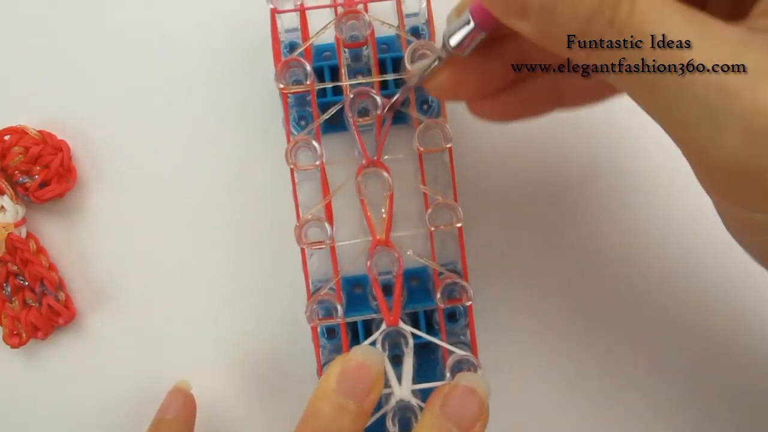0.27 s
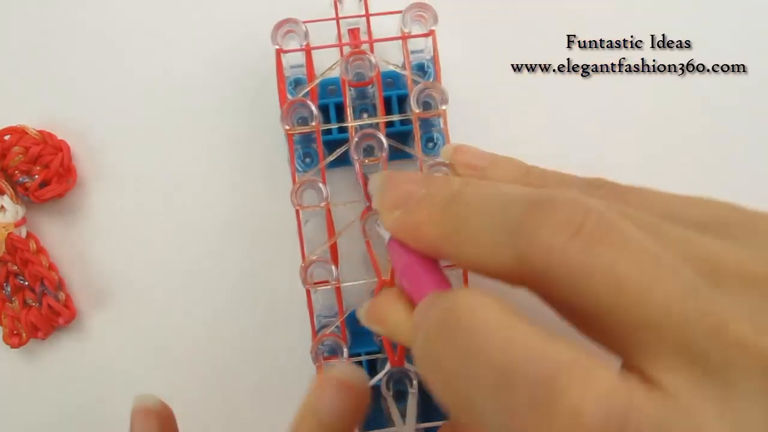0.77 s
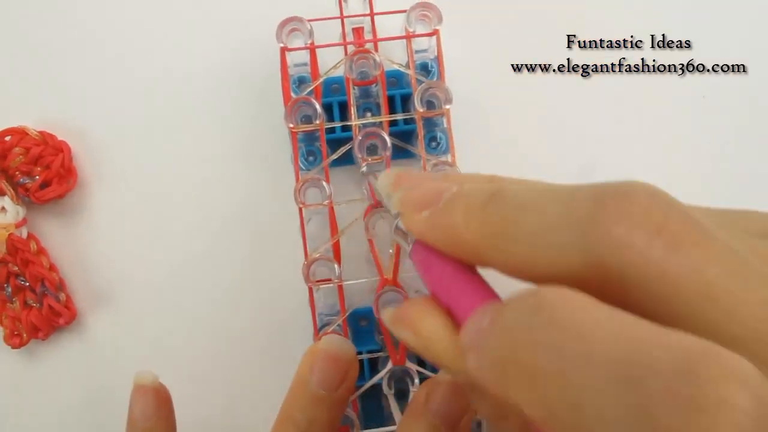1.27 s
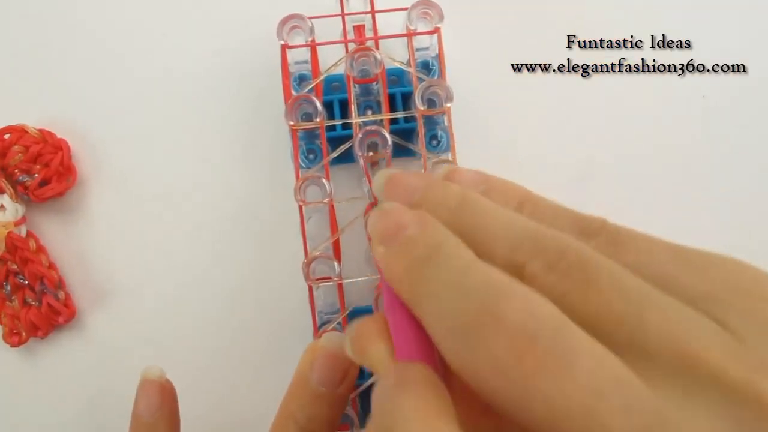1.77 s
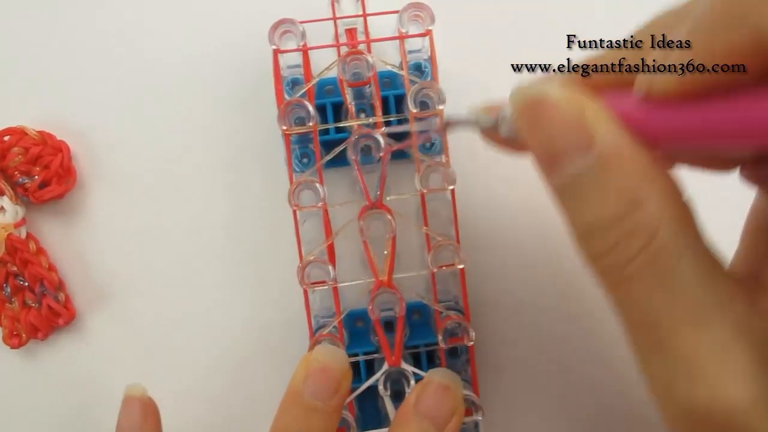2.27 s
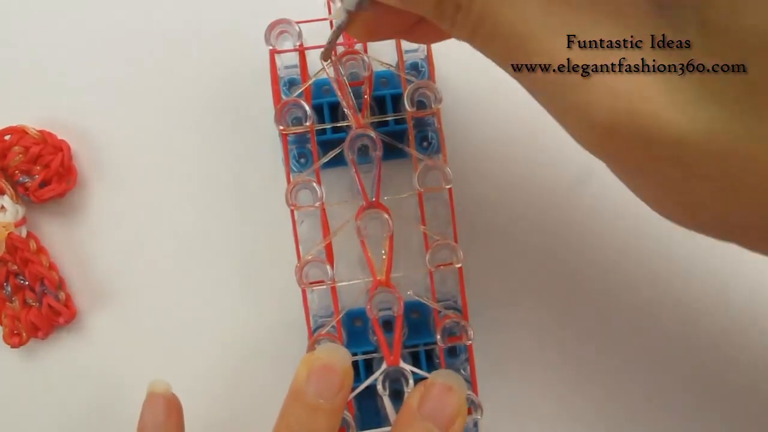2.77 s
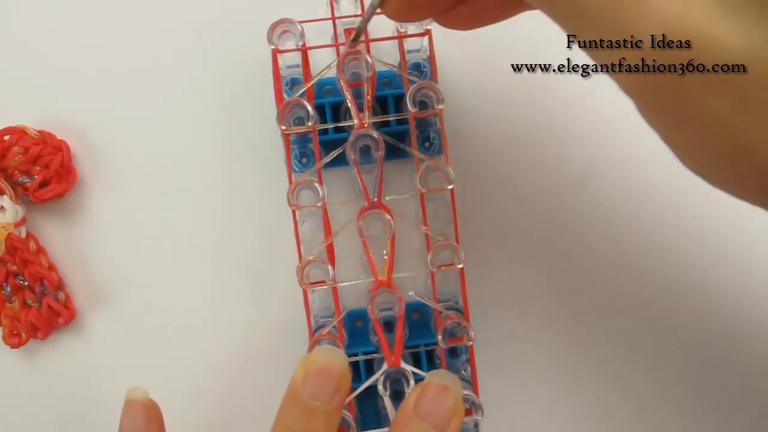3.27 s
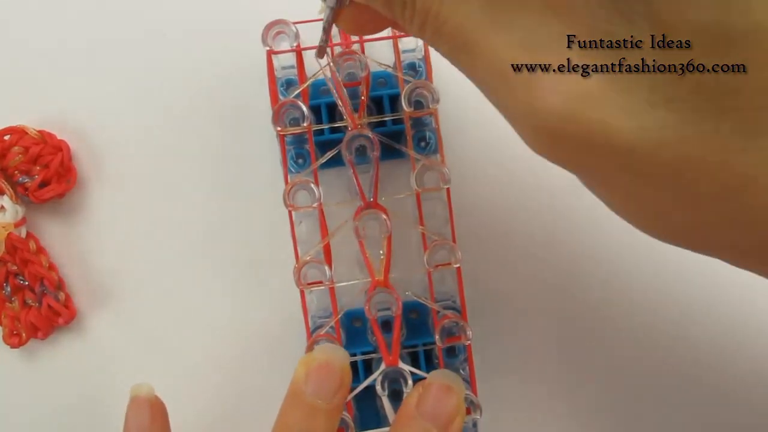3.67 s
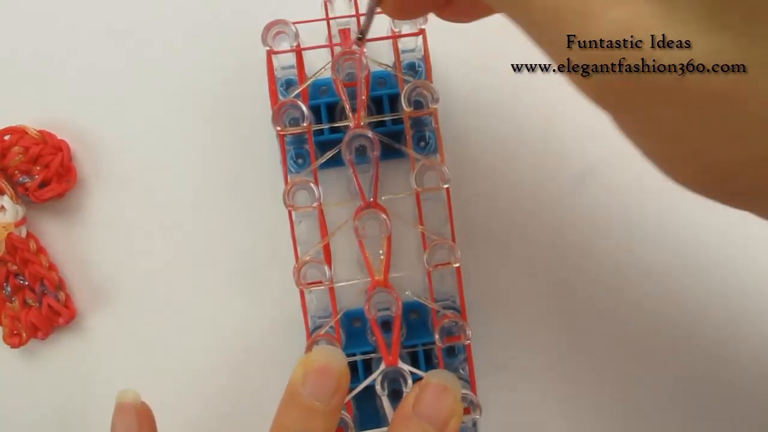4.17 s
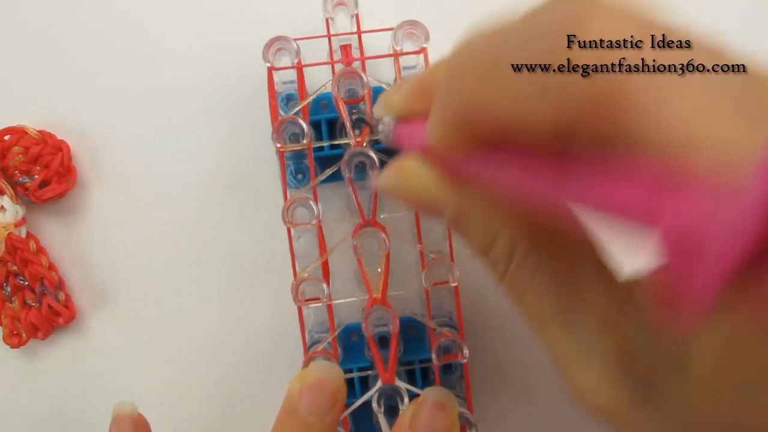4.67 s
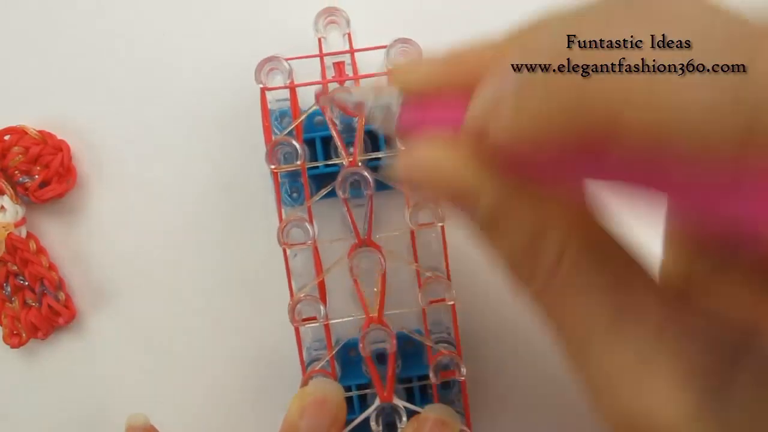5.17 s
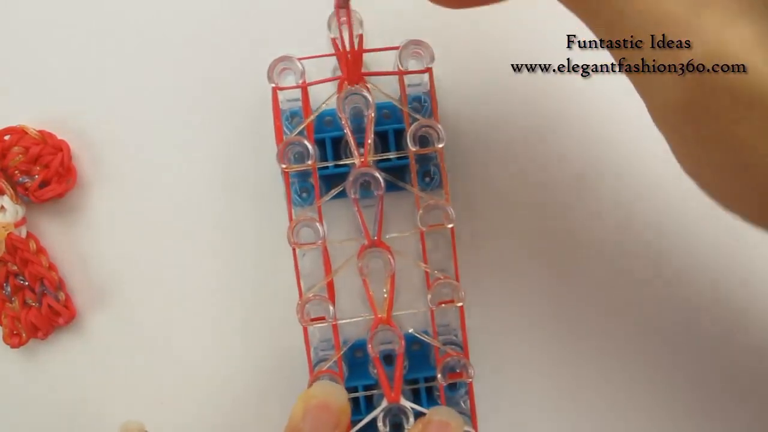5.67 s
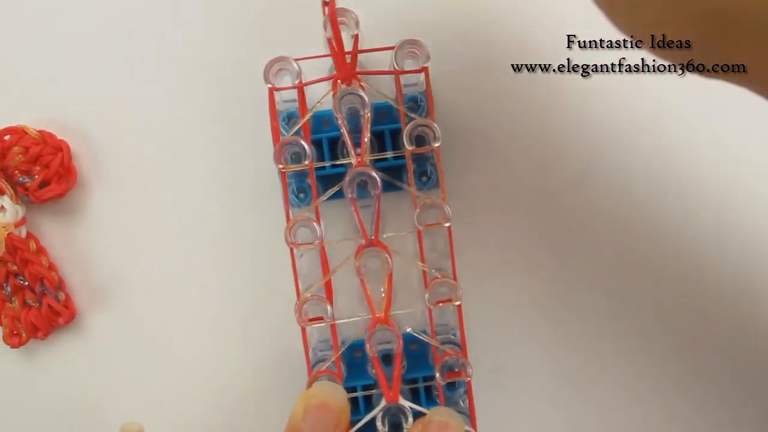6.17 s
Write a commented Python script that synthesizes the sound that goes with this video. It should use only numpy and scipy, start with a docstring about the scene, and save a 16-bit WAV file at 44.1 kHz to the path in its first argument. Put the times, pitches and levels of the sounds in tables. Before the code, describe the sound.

Small indoor room with steady low rumble, faint hum and hiss. Plastic pegs snap and tick as stretched rubber slides and squeaks along a hook, busiest in the first second. A harsh clack, mostly on the left, overwhelms the close microphone and briefly ducks everything. Then come isolated double clicks, quiet taps and soft rubs, closing with a strong hollow double knock.

```python
"""A small humming room: ventilation rumble, mains hum, hiss and a whine are steady noise bands and tones.
A hook lifts rubber bands over a plastic craft loom close to a camera, with a faint steady rub, and
stronger, squeaking slides at times. Each click is a snap, a crack and ringing peg modes over a base knock.
At about 1.1 s the hook's handle bumps the camera, which rings; the gain ducks and slowly recovers.
More clicks, taps and short rubs follow, closing with two clicks and strong knocks on the base."""
import sys
import numpy as np
from scipy import signal
from scipy.fft import rfft, irfft, next_fast_len
from scipy.io import wavfile
from scipy.ndimage import uniform_filter1d, minimum_filter1d

SR = 44100
rng = np.random.default_rng(int(sys.argv[2]) if len(sys.argv) > 2 else 0)


def generate_wav(sig):
    """Save sig (samples, or channels by samples) to the path in sys.argv[1] as 16-bit PCM at SR."""
    pcm = np.round(np.clip(np.atleast_2d(sig).T, -1, 1) * 32767).astype(np.int16)
    wavfile.write(sys.argv[1], SR, pcm)


N = 283695
TIME = np.arange(N) / SR

# Stereo colour: the left port favours presence, the right one treble.
# Each row: frequency in Hz, left-right difference in dB.
PORTS = [(1000, 2.5), (2300, 1.5), (3400, -3), (4200, 4), (5300, 10), (6100, -7.5), (7500, -16),
         (10000, -27), (16000, -23)]
# Resonances of the loom's base on the table. Each row: frequency in Hz, relative level in dB, t60 in seconds.
BASE_MODES = [(178, 9, 0.11), (301, -5, 0.069), (364.6, 1, .08), (470, -11, .04), (534.5, -0.5, .17),
              (608, 2, 0.056), (707, -7, 0.054), (781.3, 2, 0.095), (849, -5.5, 0.091), (933, -5, 0.085),
              (1041.8, 2, 0.11), (1154, -7, 0.087), (1288, -4, 0.076), (1350, -2.5, 0.094),
              (1502, -3, 0.065), (1660, 3.5, 0.033), (1726, 0.5, 0.045), (2020, 1.5, 0.065)]
# Bands sliding along the hook. Each row: start in seconds, length in seconds, peak friction in dB,
# squeak above the friction in dB, squeak start in Hz, squeak end in Hz.
SLIDES = [(0.204, 0.57, -47.5, -5, 4360, 5220), (0.817, 0.069, -37.5, -5, 5324, 5150),
          (0.892, 0.036, -54.5, 5, 5100, 5250), (0.937, 0.29, -53.5, -8, 4716, 5284),
          (4.274, 0.015, -40.5, -2, 4900, 5200), (4.536, 0.43, -59.5, -4, 4500, 4970),
          (4.93, 0.14, -68, -2, 5130, 5230), (6.362, 0.0068, -43.5, -5, 5100, 5300)]


def from_db(db):
    """Decibels to gain."""
    return 10 ** (np.asarray(db) / 20)


def rms_one(x, count=None):
    """Scale so that the first count samples have rms 1."""
    return x / np.sqrt(np.mean(x[..., :count] ** 2) + 1e-20)


def at_hz(points, hz):
    """Read a curve on a log-frequency axis."""
    f, value = np.transpose(points)
    return np.interp(np.log(np.maximum(hz, 1)), np.log(f), value)


def pan(lean_db):
    """Left and right gains of mean power 1; positive leans left."""
    gains = from_db(np.array([[.5], [-.5]]) * lean_db)
    return gains / np.sqrt(np.mean(gains ** 2, axis=0))


def noise(spectrum, size=N, channels=2, ported=False):
    """Coloured noise of rms 1, if ported as the two ports hear it."""
    padded = next_fast_len(size)
    hz = np.fft.rfftfreq(padded, 1 / SR)
    gain = from_db(at_hz(spectrum, hz))
    if ported:
        gain = gain * pan(at_hz(PORTS, hz))
    white = rfft(rng.standard_normal((channels, padded)))
    return rms_one(np.fft.irfft(white * gain, padded)[:, :size])


def drift(rate):
    """Random wander of rms 1, with rate knots per second joined by straight lines."""
    knots = rng.standard_normal(int(N / SR * rate) + 2)
    return rms_one(np.interp(TIME * rate, np.arange(len(knots)), knots))


def decay(t, t60):
    """Falls 60 dB in t60 seconds."""
    return from_db(-60 * t / t60)


def add(out, s, sound):
    """Mix a sound in at time s."""
    start = max(round(s * SR), 0)
    out[:, start:start + sound.shape[-1]] += sound[..., :max(N - start, 0)]


def emphasis(hz, centre_hz, octaves):
    """Where a blow lands decides which modes it favours."""
    return 1 / (1 + (np.log2(hz / centre_hz) / octaves) ** 2)


def emphasised(spectrum, centre_hz, octaves):
    """A noise spectrum in dB, shaped by where the blow lands."""
    return [(hz, db + 20 * np.log10(emphasis(hz, centre_hz, octaves))) for hz, db in spectrum]


def background(air_db=-47.0, hiss_db=-60.5, whine_db=-74.0, waver_rate=11, hum_lean_db=2.0, air_side_db=-14.5):
    """Ventilation rumble, a wavering mains hum, microphone hiss and a thin electronic whine."""
    # Ventilation. Each row: frequency in Hz, relative density in dB.
    air_colour = [(15, -2), (28, 5), (42, 1), (57, 1), (72, -6.5), (95, -20.5), (170, -12.5), (205, -16),
                  (240, -15), (290, -15), (440, -25), (1000, -28.5), (2500, -36.5), (6000, -51.5),
                  (16000, -76.5)]
    # Stereo tilt of the rumble. Each row: frequency in Hz, left-right difference in dB.
    air_lean = [(25, -6.5), (60, -4.5), (120, 2.5), (250, 1.5), (1000, 3)]
    # Microphone hiss. Each row: frequency in Hz, relative density in dB.
    hiss_colour = [(200, 3), (2500, -2.5), (5000, -5), (9000, -7.5), (12000, -10), (13500, -19.5),
                   (16000, -36)]
    # Mains hum. Each row: frequency in Hz, steady level in dB, wavering level in dB.
    hum_tones = [(120.1, -57.5, -52), (239.8, -65.5, -65)]

    hum = 0
    for hz, steady_db, waver_db in hum_tones:
        waver = (drift(waver_rate) + 1j * drift(waver_rate)) / np.sqrt(2)
        swing = from_db(steady_db) + from_db(waver_db) * waver
        hum = hum + np.sqrt(2) * np.real(swing * np.exp(2j * np.pi * hz * TIME))
    whine = np.sin(2 * np.pi * 8810 * TIME + drift(32)) * pan(-20.0)
    mid, side = noise(air_colour)
    air = rfft(mid + from_db(air_side_db) * side * [[1], [-1]])
    air = irfft(air * pan(at_hz(air_lean, np.fft.rfftfreq(N, 1 / SR))), N)
    hiss = noise(hiss_colour)
    return from_db(air_db) * air + pan(hum_lean_db) * hum + from_db(hiss_db) * hiss + from_db(whine_db) * whine


def room(x, early_db=-6.5, early_t60=0.083, late_db=-14.5, gap_s=0.0034):
    """Quick reflections from table and hands, then a tail that dies band by band."""
    # Tail decay. Each row: frequency in Hz, t60 in seconds.
    tail_t60 = [(300, 0.28), (1000, 0.4), (1500, 0.32), (2400, 0.1), (3300, .45), (5300, 0.47), (6500, 0.2),
                (8000, 0.57), (14000, 0.15)]
    # Tail colour. Each row: frequency in Hz, relative level in dB.
    tail_colour = [(300, -2.5), (1200, -2), (2300, -3), (3300, -2), (4400, -5), (5400, 4.5), (6600, 1.5),
                   (9000, -7)]

    t = TIME[:SR * 2 // 3]
    edges = np.geomspace(200, 16000, 22)
    late = 0
    for low, high in zip(edges, edges[1:]):
        bandpass = signal.butter(2, [low, high], "band", fs=SR, output="sos")
        band = signal.sosfilt(bandpass, rng.standard_normal((2, len(t))))
        hz = np.sqrt(low * high)
        late = late + from_db(at_hz(tail_colour, hz)) * band * decay(t, at_hz(tail_t60, hz))
    early = rng.standard_normal((2, len(t))) * decay(t, early_t60)
    onset = 1 - np.exp(-(t / gap_s) ** 2)
    response = from_db(early_db) * rms_one(early * onset) + from_db(late_db) * rms_one(late * onset)
    response = response / np.sqrt(len(t))
    # the ports sit close together, so long waves reach both alike
    side = signal.sosfilt(signal.butter(2, 2500, "high", fs=SR, output="sos"), response[1])
    response = (response[0] + side * [[1], [-1]]) / np.sqrt(2)
    return signal.fftconvolve(x, response, axes=1)[:, :N]


def sliding(resting_db=-71, swell_exponent=0.87):
    """Strength of friction and squeak: each slide swells and fades in one arch as the hook speeds up and stops."""
    # bands creep under the fingers all the time
    friction, sticking = from_db(resting_db), 0
    for s, length, db, squeak_db, _, _ in SLIDES:
        progress = np.clip((TIME - s) / length, 0, 1)
        arch = from_db(db) * np.sin(np.pi * progress) ** swell_exponent
        friction = friction + arch
        sticking = sticking + from_db(squeak_db) * arch
    return friction, sticking


def rubbing(friction, lean_db=0.0, slips_per_s=90, slip_t60=0.012, groan_db=-9.0, groan_hz=620, groan_octaves=0.49):
    """Rubber hisses along the hook under an uneven pull with many tiny slips; the force makes the base groan."""
    # Rubber hiss. Each row: frequency in Hz, relative density in dB.
    rub_colour = [(100, -7.5), (330, -1), (440, -19.5), (530, 6), (680, -12), (1000, -12.5), (1500, -11.5),
                  (2100, -14), (3000, -3), (4200, 3.5), (5000, 4.5), (6900, -4), (7800, 4), (9000, -25.5),
                  (14000, -47)]

    pull_db = 2.2 * drift(45) + 1.5 * drift(300)
    slips = (rng.random(N) < slips_per_s / SR) * rng.exponential(1, N)
    bursts = rms_one(signal.lfilter([1], [1, -decay(1 / SR, slip_t60)], slips + 1e-18))
    grip = rms_one(1 + from_db(-3) * bursts)
    force = friction * from_db(pull_db) * grip
    t = TIME[:SR // 8]
    base = 0
    for hz, db, t60 in BASE_MODES:
        strength = from_db(db) * emphasis(hz, groan_hz, groan_octaves)
        base = base + strength * np.sin(2 * np.pi * hz * t) * decay(t, t60)
    groan = signal.fftconvolve(force * rng.standard_normal(N), base / np.linalg.norm(base))[:N]
    hiss = force * pan(lean_db) * noise(rub_colour, ported=True)
    return hiss + from_db(groan_db) * pan(3.0) * groan


def squeak(sticking, lean_db=9.0, flutter_rate=520):
    """A narrow, noisy tone of sticking rubber that glides as each slide stretches the band."""
    stretch = []
    for s, length, _, _, start_hz, end_hz in SLIDES:
        stretch += [(s, start_hz), (s + length, end_hz)]
    hz = np.interp(TIME, *np.transpose(sorted(stretch)))
    # random flutter of level and phase widens the tone into a band
    flutter = drift(flutter_rate) + 1j * drift(flutter_rate)
    return sticking * pan(lean_db) * np.real(flutter * np.exp(2j * np.pi * np.cumsum(hz) / SR))


def grazes(friction, count=120):
    """The hook's tip grazes pegs at random, more often and harder in strong slides, too weakly to move the base."""
    idle_per_s, idle_db = 1.4, -63.5
    sliding_per_s, over_rub_db = 16, -3.5
    centre_hz, spread_octaves, spread_db = 5180, 0.38, -1.5

    out, t = np.zeros((2, N)), TIME[:SR // 25]
    # one possible graze in each of count equal time slots
    moments = ((np.arange(count) + rng.random(count)) * N / count).astype(int)
    for at, chance, (size, pitch) in zip(moments, rng.random(count), rng.standard_normal((count, 2))):
        sliding_db = 20 * np.log10(friction[at]) + over_rub_db
        rate = sliding_per_s if sliding_db > idle_db else idle_per_s
        if chance < rate * N / SR / count:
            db = max(sliding_db, idle_db) + spread_db * size
            hz = centre_hz * 2 ** (spread_octaves * pitch)
            add(out, at / SR, from_db(db) * peg_click(t, hz, octaves=0.38, lean_db=4.5))
    return out


def ticks(trim_db=3.5):
    """The hook's tip taps a peg without moving the base."""
    # Light taps. Each row: start in seconds, level in dB before the trim, centre in Hz, width in octaves,
    # left-right difference in dB.
    taps = [(0.4447, -42, 4250, 0.48, 9), (0.4864, -49.5, 5200, .5, 13), (0.553, -45, 5650, 0.55, -6),
            (0.579, -38.5, 5270, 0.52, 3), (0.598, -50, 5580, 0.65, -2), (0.647, -39.5, 4900, 0.17, 4),
            (0.759, -43, 4950, .25, 5), (0.9086, -50, 5150, 0.28, 6.5), (1.8647, -58, 4900, 0.49, -3),
            (1.9803, -51, 4330, 0.55, 2), (2.177, -46.5, 6400, 0.66, -2), (2.705, -51, 5650, 0.4, 3.5),
            (2.817, -52, 5000, 0.46, 5), (2.883, -41.5, 5300, 0.13, 11), (3.2164, -57.5, 5370, .3, 4),
            (3.4154, -58, 5760, 0.35, 2), (4.572, -55, 4680, 0.42, 2), (4.613, -48.5, 6020, 0.52, 5),
            (4.8215, -50.5, 4940, .2, 10), (4.9709, -47, 5330, 0.59, 5), (4.983, -45, 7150, 0.46, 4)]

    out, t = np.zeros((2, N)), TIME[:SR // 20]
    for s, db, hz, octaves, lean_db in taps:
        add(out, s, from_db(db + trim_db) * peg_click(t, hz, octaves, lean_db))
    return out


def camera_bump(rise_s=0.0019, clack_t60=0.04, clack_octaves=0.87):
    """The blow rings the camera body, mostly at the left port; the handle's own clatter goes out into the room."""
    # Handle against camera: start in seconds, peak in dB before panning, left-right difference in dB.
    bump = (1.0884, 23.6, 18)
    # Camera body. Each row: frequency in Hz, relative level in dB, t60 in seconds.
    camera_modes = [(1450, -36, 0.081), (2052, -8, 0.015), (2123, -30, 0.18), (2620, -58, 0.39),
                    (3100, -11, 0.056), (3220, -42, 0.23), (3420, 7, 0.0072), (3580, 0, 0.0095),
                    (4100, -6, .009), (4410, -13.5, 0.019), (5210, -26.5, 0.028), (6650, -46.5, 0.11),
                    (7600, -14.5, 0.004), (10700, -6, 0.0024)]
    # The handle clacks and rebounds. Each row: start in seconds, level in dB before the decay, centre in Hz.
    handle_clacks = [(1.0888, -2.5, 2960), (1.104, -11.5, 1250), (1.139, -24, 1500), (1.151, -21.5, 1860)]
    # Handle noise. Each row: frequency in Hz, relative density in dB.
    clack_colour = [(300, 0), (1400, 2.5), (2200, 8.5), (3500, 1.5), (5200, 3.5), (7000, -11),
                    (9000, -15.5), (14000, -28.5)]

    s, level_db, lean_db = bump
    body, clatter, t = np.zeros((2, N)), np.zeros((2, N)), TIME[:SR // 2]
    ring = sum(from_db(db) * np.sin(2 * np.pi * hz * t) * decay(t, t60) for hz, db, t60 in camera_modes)
    ring = ring * (1 - np.exp(-t / rise_s))
    add(body, s, from_db(level_db) * pan(lean_db) * ring / np.abs(ring).max())
    for at, clack_db, centre_hz in handle_clacks:
        colour = emphasised(clack_colour, centre_hz, clack_octaves)
        clack = noise(colour, size=len(t), channels=1) * decay(t, clack_t60)
        add(clatter, at, from_db(clack_db) * pan(4.9) * clack)
    return body, clatter


def base_knock(t, centre_hz, octaves, swell_s=0.0089, scatter_db=0.5, detune=0.0016, rattle_t60=0.18,
               chatter_t60=0.0099, rattle_db=-7):
    """The base takes the blow and rattles briefly; each knock's modes vary slightly in pitch at random."""
    ring = 0
    for hz, db, t60 in BASE_MODES:
        strength = from_db(db + scatter_db * rng.standard_normal()) * emphasis(hz, centre_hz, octaves)
        phase = 2 * np.pi * (hz * (1 + detune * rng.standard_normal()) * t + rng.random())
        ring = ring + strength * np.sin(phase) * decay(t, t60)
    # while it chatters on the table the base is more heavily damped
    chatter = rng.standard_normal(len(t)) * decay(t, rattle_t60)
    rattle = signal.fftconvolve(chatter, ring * t * decay(t, chatter_t60))[:len(t)]
    knock = rms_one(ring * (1 - np.exp(-t / swell_s))) + from_db(rattle_db) * rms_one(rattle)
    return rms_one(knock, count=1760)


def peg_click(t, centre_hz, octaves, lean_db, crack_db=5.5, crack_t60=0.02, snap_db=5.0, snap_t60=0.0038,
              note_db=3.0, note_t60=0.0036, rise_s=0.00086, scatter_db=-0.5):
    """A snap, a short crack and the damped ring of peg and hook; in narrow clicks the peg's own note stands out."""
    # Peg and hook. Each row: frequency in Hz, relative level in dB, t60 in seconds.
    peg_modes = [(1760, -5, 0.032), (2186, 3.5, 0.046), (2620, -9.5, 0.018), (3356, -1.5, 0.02),
                 (3464, 13, 0.033), (4600, -13, 0.02), (4480, -9, 0.028), (4800, -19.5, 0.026),
                 (5134, 6.5, 0.024), (5365, 8, 0.029), (5960, -2, 0.008), (6120, 0.5, 0.0067),
                 (6850, -7.5, 0.012), (7160, -5.5, 0.011), (7560, -5.5, 0.034), (8170, -7.5, 0.019),
                 (9250, -15.5, .014)]
    # Noise of the contact. Each row: frequency in Hz, relative density in dB.
    crack_colour = [(600, -14), (1600, 7.5), (2400, 0), (3300, 5), (4300, 3.5), (5500, 1), (6500, -0.5),
                    (8000, 2), (10000, -9), (12000, -18), (16000, -18)]

    attack = 220   # samples over which levels are matched, 5 ms
    # pegs differ a little in pitch: brighter clicks ring higher
    pitch = (centre_hz / 5200) ** .3
    ring = 0
    for hz, db, t60 in peg_modes:
        scatter = scatter_db * rng.standard_normal((2, 1))
        strength = from_db(db + scatter) * emphasis(hz, centre_hz, octaves)
        mode_hz = hz * pitch * (1 + 0.013 * rng.standard_normal())
        phase = 2 * np.pi * (mode_hz * t + rng.random((2, 1)))
        ring = ring + strength * pan(at_hz(PORTS, hz)) * np.sin(phase) * decay(t, t60)
    colour = emphasised(crack_colour, centre_hz, octaves)
    crack = noise(colour, size=len(t), ported=True) * decay(t, crack_t60)
    snap = noise(colour, size=len(t), ported=True) * decay(t, snap_t60)
    note = np.sin(2 * np.pi * (centre_hz * t + rng.random((2, 1)))) * decay(t, note_t60)
    click = from_db(note_db) * 1.2 / octaves * rms_one(note, attack) + rms_one(ring, attack)
    click = click + from_db(crack_db) * rms_one(crack, attack) + from_db(snap_db) * rms_one(snap, attack)
    click = click * (1 - np.exp(-t / rise_s))
    return pan(lean_db) * np.array([rms_one(side, attack) for side in click])


def loom(click_trim_db=2.0, knock_trim_db=-2.5, knock_lean_db=4.0):
    """Every contact sounds peg and base; returns the clicks, their share for the room, and the knocks."""
    # The hook or a band strikes a peg. Each row: start in seconds, click level in dB before its trim,
    # click centre in Hz, click width in octaves, left-right difference in dB, room share of the click in dB,
    # knock level in dB before its trim, knock centre in Hz, knock width in octaves.
    contacts = [(0.1124, -15.5, 4480, 0.66, 3.5, -1, -31, 1200, 0.44),
                (0.139, -19, 5750, 1, 4, -3, -31.5, 810, 0.17),
                (0.244, -12, 4720, 0.72, 4.5, 2, -27, 480, 0.26),
                (0.2465, -12, 4720, 0.34, 0.5, -15, -32, 1370, 0.37),
                (0.2873, -37, 7340, 0.13, -16, -21.5, -47, 1450, 0.13),
                (0.303, -38, 5130, 0.43, 2, -1, -55, 1450, 0.19),
                (0.702, -29, 5570, 0.45, 4, -0.5, -51.5, 485, 0.73),
                (0.8476, -31.5, 5360, 0.53, 1.5, 0.5, -37.5, 490, 0.54),
                (0.9709, -28, 7180, 0.75, -2.5, -3.5, -45.5, 821, 0.6),
                (1.3637, -39.5, 7160, 0.24, -3, -2, -50, 680, 0.83),
                (2.1989, -16, 5000, .65, -2, -2.5, -32.5, 1730, 0.43),
                (2.214, -15.5, 4500, 0.88, 4, -3, -32, 908, 0.19),
                (2.3, -48, 3960, 0.44, 8, -1, -53.5, 1220, 0.1),
                (2.3737, -30.5, 4880, 0.61, 2.5, -4.5, -43, 806, 0.14),
                (3.443, -26, 5430, 0.45, 8, -15, -54, 810, 0.66),
                (4.289, -24.5, 5990, 0.51, 1, -7.5, -42.5, 1280, 0.15),
                (5.406, -16, 5140, 0.51, 7.5, -9, -36, 1360, 0.074),
                (5.4152, -16.5, 4750, 0.68, 6, -1.5, -28.5, 1104, 0.3),
                (6.08, -25, 5960, 0.3, 2, -8, -45, 985, 0.3),
                (6.125, -58, 5000, 0.59, 3, -4, -51.5, 670, 0.13),
                (6.3703, -15.5, 6150, 0.7, 1, -4.5, -18, 740, 0.26),
                (6.3756, -16.5, 5230, 0.85, 2, -3, -19.5, 990, 0.28)]

    clicks, spread, knocks = np.zeros((2, N)), np.zeros((2, N)), np.zeros((2, N))
    t = TIME[:SR // 5]
    for s, click_db, click_hz, click_octaves, lean_db, room_db, knock_db, knock_hz, knock_octaves in contacts:
        click = from_db(click_db + click_trim_db) * peg_click(t, click_hz, click_octaves, lean_db)
        add(clicks, s, click)
        add(spread, s, from_db(room_db) * click)
        knock = from_db(knock_db + knock_trim_db) * base_knock(t, knock_hz, knock_octaves)
        add(knocks, s, pan(knock_lean_db) * knock)
    return clicks, spread, knocks


def scene():
    """The loom and the bump in their room, over the background."""
    friction, sticking = sliding()
    touches = ticks() + grazes(friction)
    body, clatter = camera_bump()
    clicks, spread, knocks = loom()
    reflections = room(spread + clatter + from_db(-13) * touches)
    # the knocks get weaker early reflections and a stronger tail, so their pitches stay clear
    reflections = reflections + room(knocks, early_db=-11, late_db=-8)
    rubber = rubbing(friction) + squeak(sticking)
    return background() + rubber + touches + body + clatter + knocks + clicks + reflections


def gain_control(x, ceiling_db=-5.5, release_s=0.72, start_db=1.5):
    """Peaks over the ceiling pull the gain down at once; it creeps back over a second or two."""
    over_db = np.maximum(20 * np.log10(np.abs(x).max(axis=0) + 1e-9) - ceiling_db, 0)
    fade = np.exp(-TIME / release_s)
    # the gain starts out already cut by start_db
    cut_db = np.maximum(np.maximum.accumulate(over_db / fade), start_db) * fade
    # hold and smooth over 1 ms
    return x * from_db(uniform_filter1d(minimum_filter1d(-cut_db, size=45), size=45))


def record(dry):
    """Gain control, then a steep low-pass cuts the top."""
    top_cut = signal.cheby2(12, 70, 16900, fs=SR, output="sos")   # stopband from 16900 Hz, 70 dB down
    return signal.sosfilt(top_cut, gain_control(dry))


dry = scene()
out = record(dry)
generate_wav(out)
```